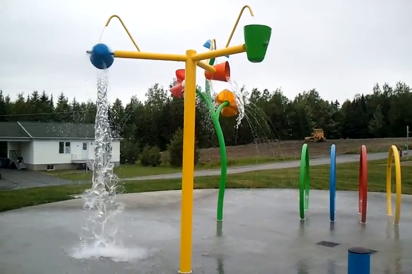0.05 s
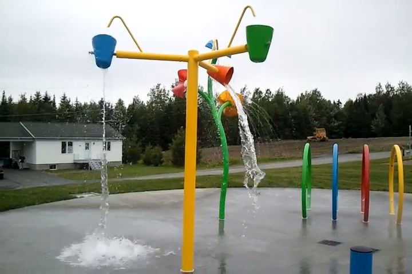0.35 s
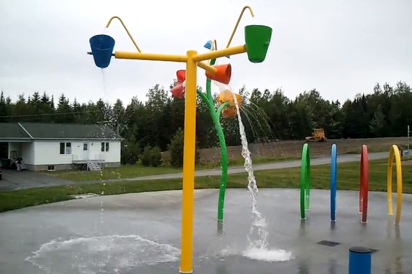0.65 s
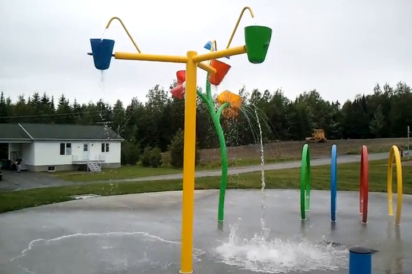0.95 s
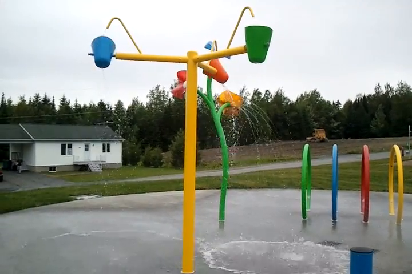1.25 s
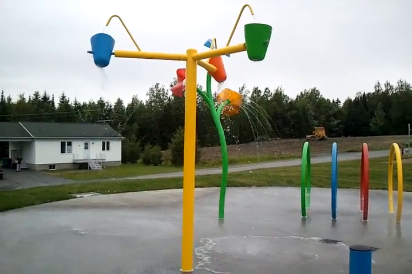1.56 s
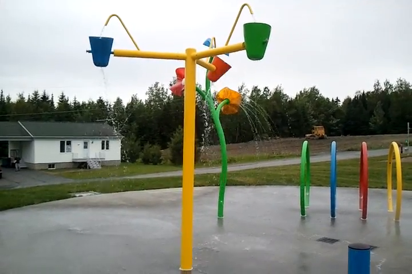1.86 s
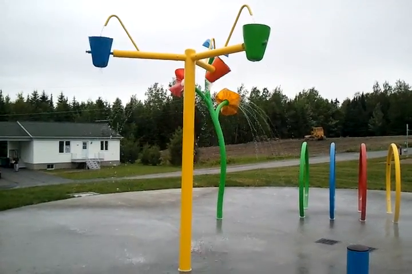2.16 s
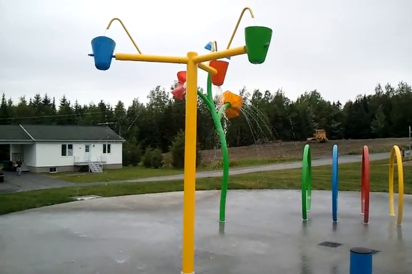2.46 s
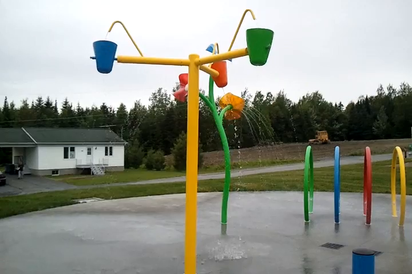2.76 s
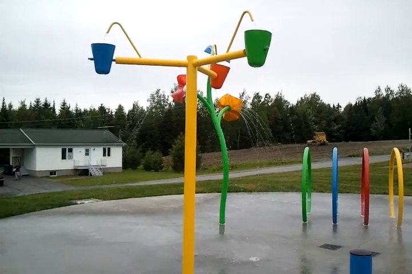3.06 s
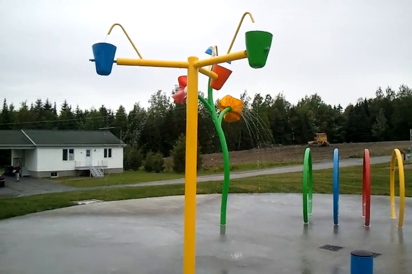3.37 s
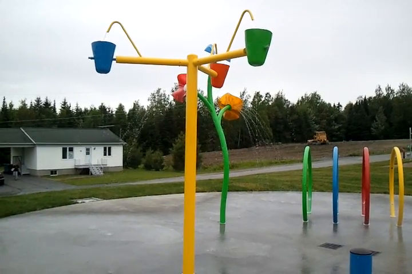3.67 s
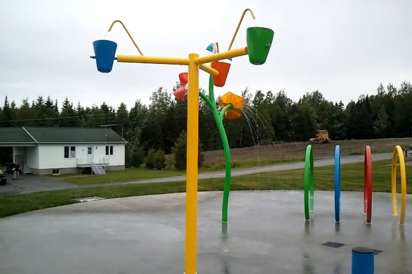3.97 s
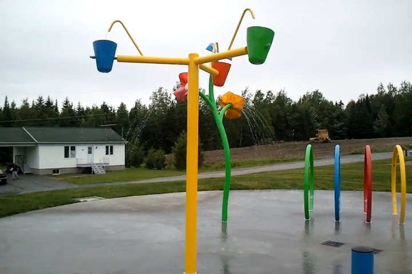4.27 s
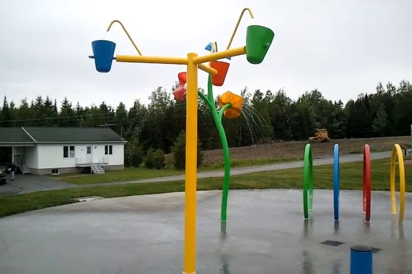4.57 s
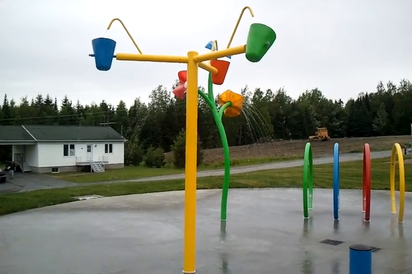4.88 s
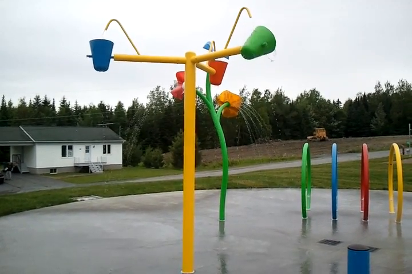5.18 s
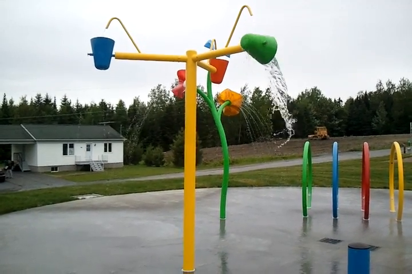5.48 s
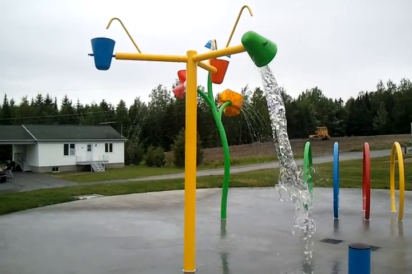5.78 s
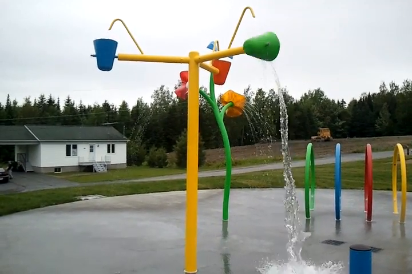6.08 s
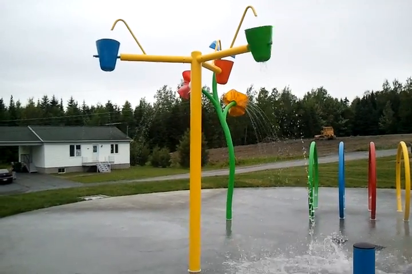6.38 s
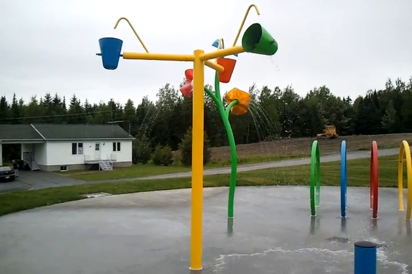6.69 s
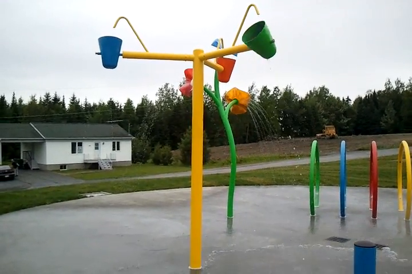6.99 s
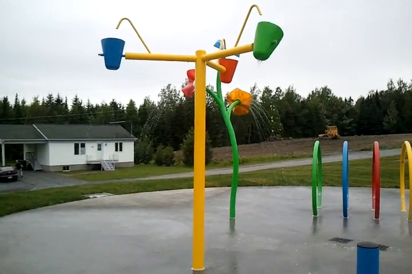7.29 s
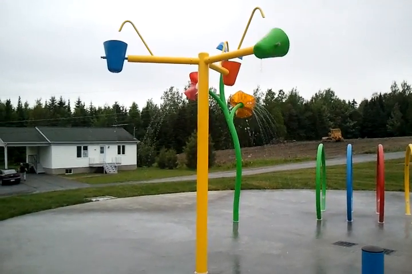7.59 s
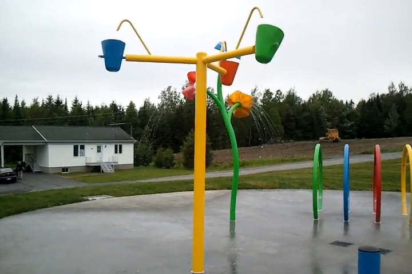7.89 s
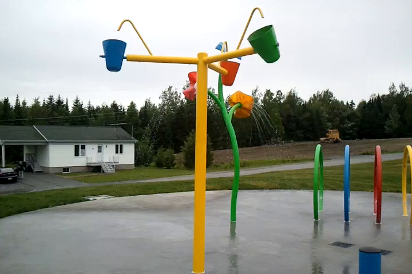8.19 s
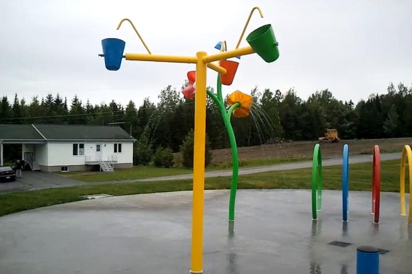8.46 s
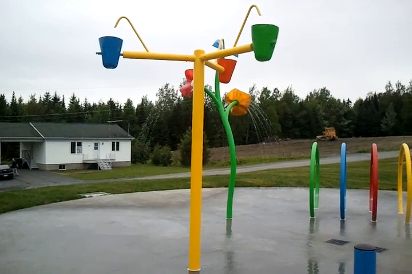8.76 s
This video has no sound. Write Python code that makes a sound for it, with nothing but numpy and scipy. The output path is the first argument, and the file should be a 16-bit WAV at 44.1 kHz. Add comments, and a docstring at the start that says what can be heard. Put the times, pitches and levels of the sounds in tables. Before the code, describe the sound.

A sprinkler patters while two loads of water splash onto concrete in quick succession, then a third later, with soft wind bumps.

```python
"""Two loads of water slap onto wet concrete almost together; a third follows about six seconds in.
They fall from tipping buckets at an empty outdoor splash pad. Each load lands in lumps, churns up
bubbles in its own puddle and scatters into drops. A sprinkler patters all the while,
and light wind bumps against the microphone."""
import sys
import numpy as np
from scipy import signal
from scipy.fft import rfft, irfft
from scipy.io import wavfile

SR = 44100
rng = np.random.default_rng(int(sys.argv[2]) if len(sys.argv) > 2 else 0)


def store_wav(level_fs):
    """Save 16-bit WAV to argv[1]."""
    pcm = np.round(np.clip(np.atleast_2d(level_fs), -1, 1) * 32767)
    wavfile.write(sys.argv[1], SR, pcm.T.astype(np.int16))


N = 389403
TIME = np.arange(N) / SR

# Levels in these tables are relative: the functions set the final loudness.
# Bucket loads: start_s, lumps_db, lumps_hold_s, churn_db, spray_db, pound_db, churn_fade_db_per_s
BUCKET_LOADS = [(0, -20, 0.21, -25, -18.5, -46, 42), (0.659, -22, .2, -25.5, -22.5, -44, 88),
                (5.937, -22.5, .08, -23, -22.5, -35, 169)]
# Big lumps of water landing flat, and a few heavy drips later on: start_s, smack_db, spray_db, decay_s
LUMP_HITS = [(0.022, -2.5, -12.5, 0.0024), (0.043, -3.5, -16, 0.0039), (.064, -7, -14, 0.0056),
             (0.169, -9, -20, 0.0042), (0.193, -23, -10, 0.0058), (.237, -5.5, -13, .012),
             (.313, -6.5, -14.5, 0.0037), (0.875, -8, -14, 0.009), (.906, -3.5, -11, 0.0024),
             (1.060, -4, -17, 0.0024), (1.174, -7.5, -28, .0022), (1.237, -8, -22, 0.0023),
             (2.929, -24, -18, 0.0028), (5.938, -3.5, -8.5, 0.0011), (5.979, -12.5, -12.5, 0.0067),
             (6.041, -8.5, -9, 0.0068), (6.056, -11, -12, .0053), (6.094, -8, -13.5, .014),
             (6.15, -8, -14.5, 0.0089), (6.161, -4.5, -19, 0.0041), (6.264, -11.5, -20, 0.0088),
             (6.316, -9, -13.5, 0.0033), (6.522, -13.5, -19, 0.0043), (6.622, -4, -20, 0.0016),
             (6.728, -13, -14, .0023), (7.031, -14.5, -26, .0019), (7.499, -16, -15, 0.0033),
             (7.544, -16.5, -22, .0023), (7.612, -8.5, -12, 0.0022), (7.83, -26, -16, .0018),
             (8.192, -15.5, -32, 0.002), (8.457, -12.5, -21, .0015)]
# The biggest drops on the wet concrete: start_s, level_db, pitch_hz
DROP_HITS = [(0.1043, -7, 5080), (0.1575, -3, 5120), (0.2808, -2.5, 4830), (0.628, -4, 5030),
             (0.7278, -3, 5140), (1.1197, -8, 4520), (1.2354, -3.5, 4520), (1.283, -5, 4660),
             (1.4464, -4, 4950), (1.4767, -4.5, 5100), (1.5529, -6.5, 5120), (1.869, -1, 4920),
             (1.952, -5, 5280), (2.0878, -3, 4960), (2.1064, -0.5, 5340), (2.1798, -3.5, 4690),
             (2.3181, -6.5, 5180), (2.7995, -5, 5250), (3.0119, -6, 5060), (3.1077, -8, 5280),
             (3.149, -5.5, 5250), (3.5805, -9.5, 4470), (3.822, -6.5, 4270), (3.8528, -10, 5370),
             (4.118, -9.5, 5480), (4.303, -12, 4480), (5.2781, -9.5, 5270), (5.9725, -2.5, 5450),
             (6.8587, -10, 5300), (7.083, -9.5, 5100), (7.3378, -6, 5250), (7.7028, -8.5, 4910),
             (8.2532, -12, 4700)]
# Last water trailing from a bucket, and more as it swings back: start_s, hold_s, drops_db, slaps_db
BUCKET_DRIBBLES = [(0.551, 0.11, -24, -21.5), (1.172, 0.19, -25.5, -28), (1.705, .2, -28, -32),
                   (2.069, 0.22, -24.5, -32.5), (2.463, .3, -26, -35), (2.896, 0.25, -31.5, -33.5),
                   (3.497, .7, -38.5, -42.5), (6.544, 0.099, -29, -34), (7.265, .65, -35, -39)]
# The breeze falling to a lull and picking up again: time_s, level_db
BREEZE_LEVELS = [(0, -39.5), (1, -42.5), (1.4, -35.5), (2.4, -42.5), (3.0, -38), (4.2, -43.5), (4.8, -40.5),
                 (4.95, -49.5), (6.25, -47.5), (6.7, -49), (7.65, -47.5), (8.15, -43.5), (8.83, -52)]
# Swirls of air that hit the microphone: time_s, level_db, length_s, pitch_hz
WIND_BUMPS = [(0.47, -12, 0.014, 148), (0.817, -9.5, .023, 162), (1.184, -12.5, 0.022, 172),
              (1.266, -14, 0.02, 169), (1.322, -11, .0063, 139), (1.352, -8, 0.0035, 154),
              (1.505, -10.5, .035, 171), (1.66, -10, .0063, 155), (1.694, -6, 0.0049, 200),
              (2.004, -6, 0.012, 255), (2.162, -8.5, 0.033, 177), (2.647, -14.5, 0.039, 176),
              (3.184, -6, 0.021, 167), (3.475, -17, .0062, 160), (3.658, -14, 0.016, 157),
              (3.731, -18.5, .013, 146), (3.849, -19, 0.0092, 150), (4.374, -20, 0.033, 150),
              (4.576, -16.5, 0.014, 169), (4.76, -20.5, 0.099, 138), (5.17, -24, 0.096, 130),
              (7.049, -21, 0.023, 127), (7.837, -24.5, 0.085, 130), (8.098, -18.5, 0.033, 150)]
# Strength of the short, hollow echo, greatest for the nearest load: time_s, echo_share
HOLLOW_ECHO = [(0, .18), (1.2, .15), (2, .05), (5.7, .08), (5.95, .42), (6.35, .42), (6.7, .3), (7.6, .25),
               (8.83, .12)]
# Tone colours, or how strong each sound is from low to high: frequency_hz, gain_db
AIR_TONE = [(25, -1.5), (100, -19.5), (250, -1), (520, -5), (950, 0), (1500, -4), (2050, -2), (2400, -5),
            (5000, 3), (8800, -12.5)]  # broad hush
WIND_TONE = [(20, -31.5), (45, -13), (80, -0.5), (120, 1), (190, -4), (300, -9.5), (450, -21), (900, -29),
             (3000, -65)]  # low rumble
DROP_TONE = [(400, -31), (1600, -16), (2100, -11), (2400, -17.5), (3200, -12), (3850, -6), (4200, -7),
             (4600, -3), (5300, -2), (6400, -9.5), (7100, -7), (8000, -12.5), (8800, -26)]  # bright tick
SLAP_TONE = [(200, -29.5), (600, -13), (1000, -11.5), (1450, -11), (1750, -4.5), (2030, 3), (2350, -9),
             (2700, -2), (3150, -4.5), (5000, -1), (6300, -5.5), (7800, -8.5), (8800, -37.5)]  # flat smack
CHURN_TONE = [(80, -27), (200, -8), (320, -5.5), (470, -15), (700, -5), (950, 1.5), (1400, -9), (1950, 1.5),
              (2350, -18), (5000, -26.5)]  # hollow gush
POUND_TONE = [(80, -27), (180, -17.5), (280, 4), (400, -2), (560, -3.5), (900, -22), (3000, -49)]  # deep pounding

SPRINKLER_DROPS_DB, SPRINKLER_SLAPS_DB = -28.5, -42.5
LUMP_RISE_S, LUMP_FADE_DB_PER_S = 0.17, 29
SPRAY_RISE_S, SPRAY_HOLD_S, SPRAY_FADE_DB_PER_S = 0.11, 0.19, 9  # spray outlasts the lumps
BUCKET_EMPTY_S, POUND_RISE_S, POUND_FADE_DB_PER_S = 0.39, 0.35, 113
DRIBBLE_RISE_S, DRIBBLE_FADE_DB_PER_S = 0.045, 45.5
SWIRLS_PER_S, SWIRL_BOOST_DB, SWIRL_SPREAD_DB, SWIRL_S, SWIRL_HZ = 4, 13, 7, 0.018, 150
STRAYS_PER_S, STRAY_DB, STRAY_SPREAD_DB, STRAY_FOLLOW_SHARE = 7.4, -15, 1.5, 0.55


def amp(db):
    """Turns decibels into a number to multiply a sound by."""
    return 10 ** (np.asarray(db) / 20)


def unit(x):
    """Scales a signal so that its average strength (rms) is one."""
    return x / np.sqrt(np.mean(x ** 2) + 1e-20)


def curve(rows):
    """Joins (time_s, value) rows with straight lines."""
    return np.interp(TIME, *np.transpose(rows))


def add(mix, start_s, sound):
    """Mixes a sound in at the given time."""
    part = mix[max(round(start_s * SR), 0):][:len(sound)]
    part += sound[:len(part)]


def swell(start_s, rise_s, hold_s, fade_db_per_s):
    """A volume that grows evenly, holds, then dies away."""
    age = TIME - start_s
    return np.clip(age / rise_s, 0, 1) * amp(-fade_db_per_s * np.maximum(age - rise_s - hold_s, 0))


def together(gains):
    """The level in dB of several flows sounding at once."""
    return 10 * np.log10(np.sum(np.square(gains), axis=0) + 1e-12)


def wander(rate_hz):
    """A smooth random wobble; a higher rate makes it quicker."""
    hz = np.fft.rfftfreq(N, 1 / SR)
    return unit(irfft(rfft(rng.standard_normal(N)) * np.exp(-(hz / rate_hz) ** 2), N))


def colour(x, tone, size=4096):
    """Gives a sound a tone colour. The filter never rings early, so clicks keep their sharp start."""
    hz, db = np.transpose(tone)
    log_hz = np.log(abs(np.fft.fftfreq(size, 1 / SR)) + 1)
    log_gain = np.log(amp(np.interp(log_hz, np.log(hz), db)))
    response = np.exp(np.conj(signal.hilbert(log_gain)))
    taps = np.fft.ifft(response).real[:size // 2]
    return signal.oaconvolve(x, taps)[:len(x)]


def band(x, hz, octaves):
    """Keeps the sound within about this many octaves on either side of hz."""
    grid_hz = np.geomspace(100, SR / 2, num=24)
    gain_db = -10 * np.log10(1 + (np.log2(grid_hz / hz) / octaves) ** 4)
    return colour(x, np.c_[grid_hz, gain_db], size=len(x))


def spatter(decay_s, size):
    """A burst of noise that dies away."""
    return rng.standard_normal(size) * np.exp(-np.arange(size) / SR / decay_s)


def shower(per_s, spread_db, cap, low_hz, high_hz, octaves, decay_s, count=64):
    """Tiny hits at random moments, many soft and few loud, in a mix of pitches and lengths."""
    hit = rng.random(N) < per_s / SR
    size_db = spread_db * np.minimum(rng.exponential(1, N), cap)
    clicks = hit * amp(size_db) * rng.choice([-1, 1], N) / np.sqrt(per_s)
    kind = rng.integers(0, count, N)
    shapes = []
    for hz in np.linspace(low_hz, high_hz, count):
        burst = spatter(decay_s * 2 ** rng.uniform(-0.085, 1), size=1024)
        shapes.append(unit(band(burst, hz, octaves)))
    out, at = np.zeros(N), np.flatnonzero(hit)
    for lag, column in enumerate(np.transpose(shapes)):  # each click sets off its own kind of burst
        out[(at + lag) % N] += clicks[at] * column[kind[at]]
    return unit(out)


def impact(hz, octaves, decay_s, crack, tone):
    """One big hit: a clean crack, then a dying spatter."""
    blow = spatter(decay_s, size=3072)
    blow[0] = crack
    sound = colour(band(blow, hz, octaves), tone)
    return sound / np.linalg.norm(sound) * np.sqrt(SR / 1000)  # energy of 1 ms at full level


def open_air():
    """The even hush of the outdoors."""
    return amp(-38) * unit(colour(rng.standard_normal(N), AIR_TONE))


def wind():
    """Wind rumbles on the microphone; each swirl of air adds a thud, a push wrapped in brief noise."""
    breeze_db = curve(BREEZE_LEVELS)
    rumble_db = breeze_db - 1 + 3.77 * wander(28) + 1.7 * wander(4.9)
    out = amp(rumble_db) * unit(colour(rng.standard_normal(N), WIND_TONE))
    small_bumps = []
    for when, size in rng.random((round(SWIRLS_PER_S * N / SR), 2)):
        db = breeze_db[int(when * N)] + SWIRL_BOOST_DB + SWIRL_SPREAD_DB * size
        small_bumps.append((when * N / SR, db, SWIRL_S, SWIRL_HZ))
    t = np.arange(-SR // 10, SR // 10) / SR
    push = 10 * (t == 0)
    for time_s, db, length_s, hz in WIND_BUMPS + small_bumps:
        swirl = rng.standard_normal(len(t)) * np.exp(-2 * abs(t) / length_s)
        tone = [(hz / 6, -26), (hz * 0.57, 0), (hz * 1.19, 0),
                (hz * 2.3, -12), (hz * 4.45, -34), (hz * 16, -70)]
        thud = colour(swirl + push, tone)
        add(out, time_s + t[0] - 0.003, amp(db - 6.5) * thud / abs(thud).max())
    return out


def drop_level():
    """The level in dB of falling drops: each load's spray, the dribbles and the sprinkler."""
    spray = [amp(db) * swell(start_s, SPRAY_RISE_S, SPRAY_HOLD_S, SPRAY_FADE_DB_PER_S)
             for start_s, *_, db, _, _ in BUCKET_LOADS]
    dribbles = [amp(db) * swell(start_s, DRIBBLE_RISE_S, hold_s, DRIBBLE_FADE_DB_PER_S)
                for start_s, hold_s, db, _ in BUCKET_DRIBBLES]
    return together(spray + dribbles + [np.full(N, amp(SPRINKLER_DROPS_DB))])


def patter(drops_db):
    """Nearby drops tick over a fizz of fine spray; more water means more drops."""
    per_s = 560 * amp(1.1 * (drops_db + 30))
    ticks = shower(per_s, spread_db=4.2, cap=3.2, low_hz=2500, high_hz=8500, octaves=0.4, decay_s=0.0004)
    fizz = amp(-2) * rng.standard_normal(N)
    gain = amp(drops_db - 4 + wander(63) + 0.5 * wander(8))
    return gain * unit(colour(ticks + fizz, DROP_TONE))


def plinks(drops_db):
    """Drops falling into puddles leave small bubbles, which ring briefly."""
    out, t = np.zeros(N), np.arange(SR // 40) / SR
    for when, pitch, size in rng.random((600, 3)):
        hz = 2070 * 2 ** (0.2 * (pitch - 0.5))
        ring = np.sin(2 * np.pi * hz * t) * np.exp(-t / 0.0045)
        add(out, when * N / SR, amp(16 * size ** 2) * ring)
    return amp(drops_db - 20.5) * unit(out)


def slap_level():
    """The level in dB of landing lumps: the front of each load, the dribbles and the sprinkler."""
    lumps = [amp(db) * swell(start_s, LUMP_RISE_S, hold_s, LUMP_FADE_DB_PER_S)
             for start_s, db, hold_s, *_ in BUCKET_LOADS]
    dribbles = [amp(db) * swell(start_s, DRIBBLE_RISE_S, hold_s, DRIBBLE_FADE_DB_PER_S)
                for start_s, hold_s, _, db in BUCKET_DRIBBLES]
    return together(lumps + dribbles + [np.full(N, amp(SPRINKLER_SLAPS_DB))])


def slaps():
    """Falling water tears into lumps that land in clusters, each with a short, flat smack."""
    level_db = slap_level()
    per_s = 450 * amp(0.8 * (level_db + 38))
    smacks = shower(per_s, spread_db=4.5, cap=3.44, low_hz=1180, high_hz=4520,
                    octaves=1.82, decay_s=0.00081)
    return amp(level_db - 1.5 + 3 * wander(41)) * unit(colour(smacks, SLAP_TONE))


def churn():
    """A load traps air in its puddle: bubbles gush over a deep pounding, growing until it is all down."""
    flow_db = together([amp(db) * swell(start_s, BUCKET_EMPTY_S, 0, fade)
                        for start_s, _, _, db, _, _, fade in BUCKET_LOADS])
    pound_db = together([amp(db) * swell(start_s, POUND_RISE_S, 0, POUND_FADE_DB_PER_S)
                         for start_s, *_, db, _ in BUCKET_LOADS])
    bubbles = shower(per_s=1500, spread_db=5.5, cap=2.98, low_hz=246, high_hz=2060,
                     octaves=0.57, decay_s=0.0021, count=128)
    gush = amp(flow_db + 1.7 + 2 * wander(44)) * unit(colour(bubbles, CHURN_TONE))
    pounding = amp(pound_db) * unit(colour(rng.standard_normal(N), POUND_TONE))
    return gush + pounding


def big_lumps():
    """Whole lumps of water, and a few heavy drips, smack the concrete and throw off a puff of spray."""
    out = np.zeros(N)
    for start_s, smack_db, spray_db, decay_s in LUMP_HITS:
        smack = amp(smack_db - 5.5) * impact(1980, 0.85, decay_s, crack=6.5, tone=SLAP_TONE)
        spray = amp(spray_db - 2) * impact(3970, 0.81, decay_s, crack=6.5, tone=DROP_TONE)
        add(out, start_s, np.sqrt(decay_s / 0.0023) * (smack + spray))  # longer hits carry more energy
    return out


def big_drops(drops_db):
    """Heavy drops crack brightly on the film of water; smaller strays fall at random among them."""
    out, strays = np.zeros(N), []
    for when, size, pitch in rng.random((round(STRAYS_PER_S * N / SR), 3)):
        over_sprinkler_db = drops_db[int(when * N)] - SPRINKLER_DROPS_DB
        db = STRAY_DB + STRAY_FOLLOW_SHARE * over_sprinkler_db - STRAY_SPREAD_DB * np.log(size + 0.13)
        strays.append((when * N / SR, db, 4400 + 1100 * pitch))
    for start_s, db, hz in DROP_HITS + strays:
        tick = impact(hz, octaves=0.54, decay_s=0.0017, crack=3.6, tone=DROP_TONE)
        add(out, start_s, amp(db - 6) * tick)
    return out


def hollow_echo(x, delay_s=0.001273):
    """A quick upside-down echo weakens evenly spaced pitches, so the splashes sound hollow."""
    return x - curve(HOLLOW_ECHO) * np.interp(TIME - delay_s, TIME, x)


def far_echoes(x, count=240):
    """Scattered echoes come back from posts, a house and trees, fading over half a second."""
    echo = np.zeros(SR // 2)
    at = rng.integers(SR // 200, len(echo), count)
    echo[at] = rng.choice([-1, 1], count) * amp(-60 * at / SR / 0.5)
    return signal.oaconvolve(x, echo / np.linalg.norm(echo))[:N]


def scene():
    """Mixes the water, its faint echoes, the wind and the open air into one channel."""
    drops_db = drop_level()
    air = open_air() + wind()
    puddles = churn() + plinks(drops_db)
    splashes = slaps() + big_lumps() + patter(drops_db) + big_drops(drops_db)
    water = puddles + hollow_echo(splashes)
    return (water + amp(-16) * far_echoes(water) + air)[None]


def record(dry):
    """The microphone loses the high treble and clips the sharpest peaks; a last filter trims the top."""
    microphone = signal.firwin(151, cutoff=8650, window=("kaiser", 8), fs=SR)
    dulled = signal.oaconvolve(dry, microphone[None], "same")
    clipped = np.clip(dulled, -0.73, 0.73)
    low_pass = signal.firwin(301, cutoff=15800, window=("kaiser", 8), fs=SR)
    return signal.oaconvolve(clipped, low_pass[None], "same")


dry = scene()
out = record(dry)
store_wav(out)
```